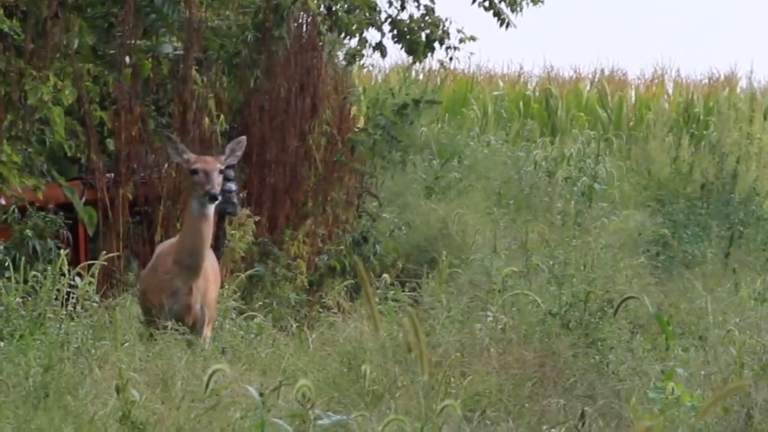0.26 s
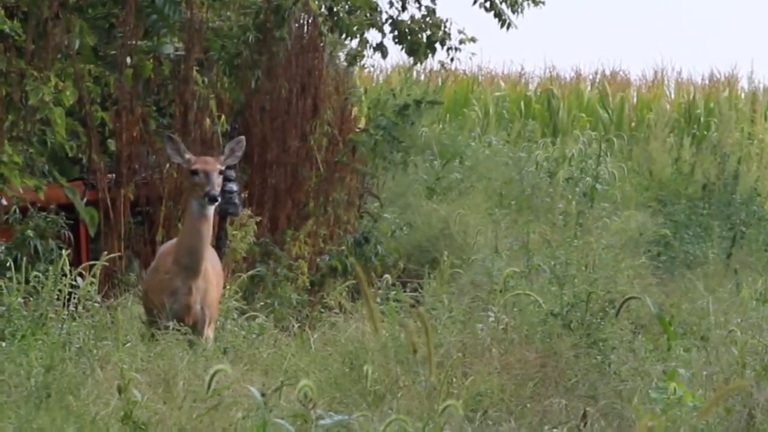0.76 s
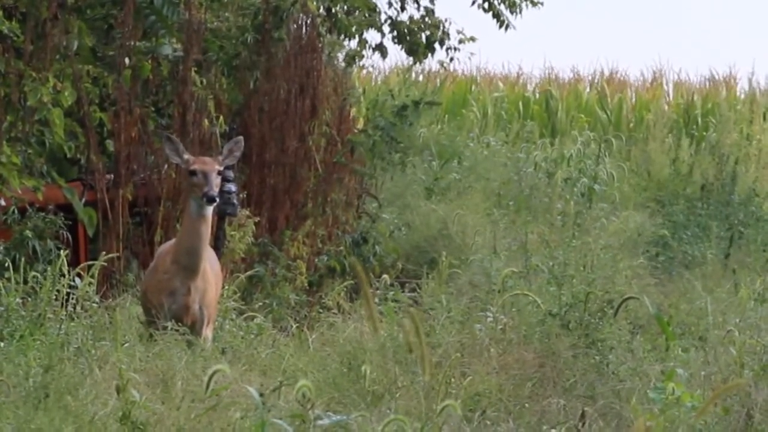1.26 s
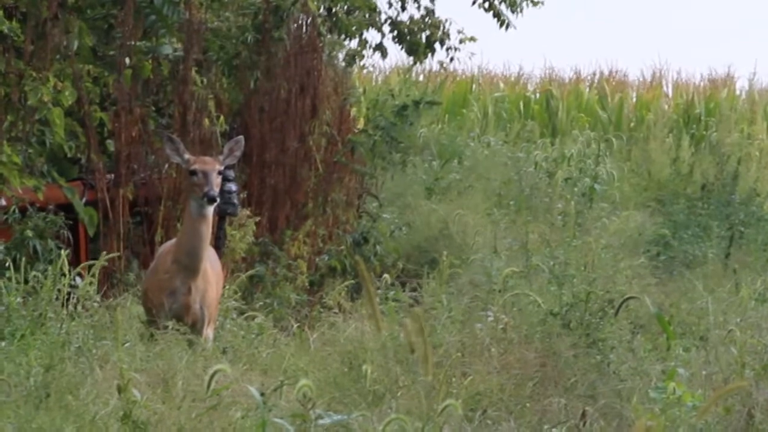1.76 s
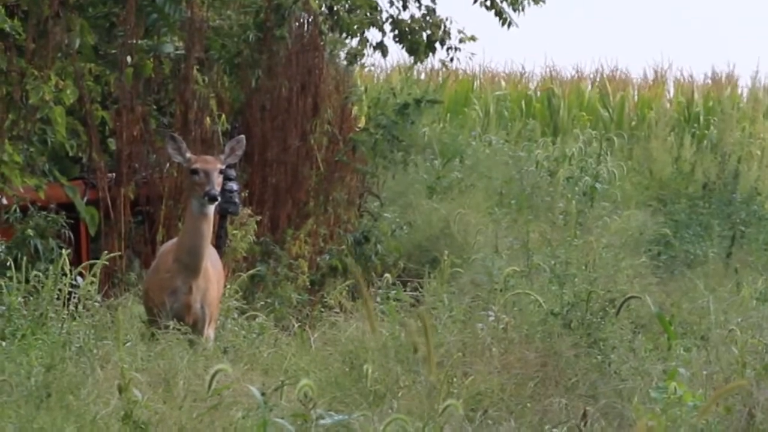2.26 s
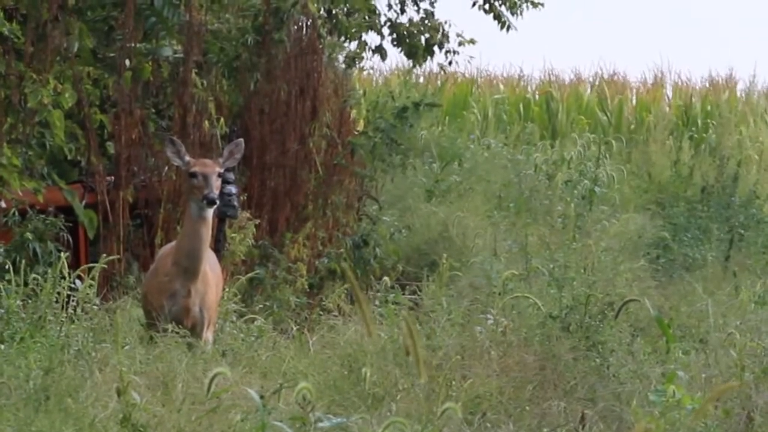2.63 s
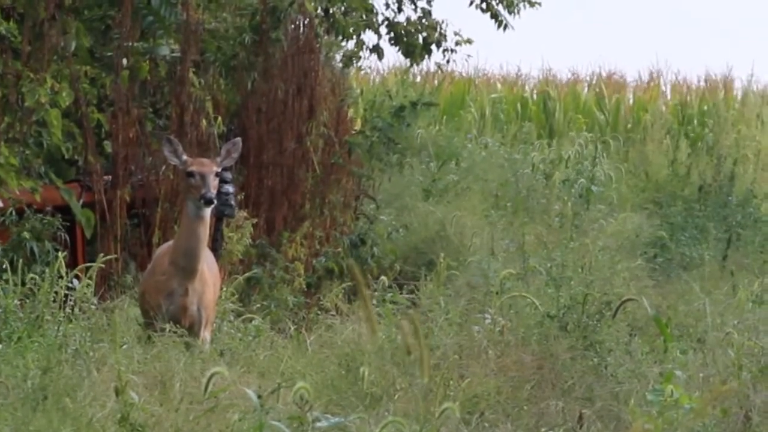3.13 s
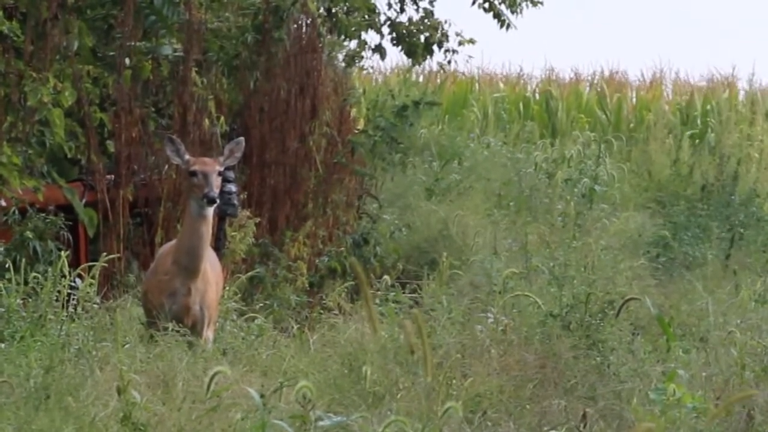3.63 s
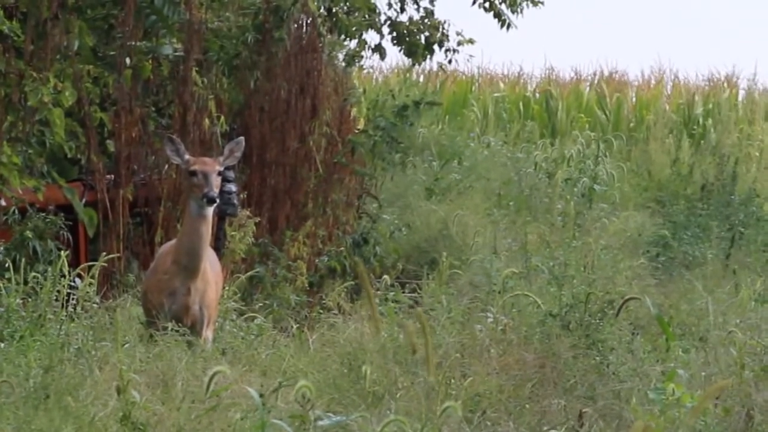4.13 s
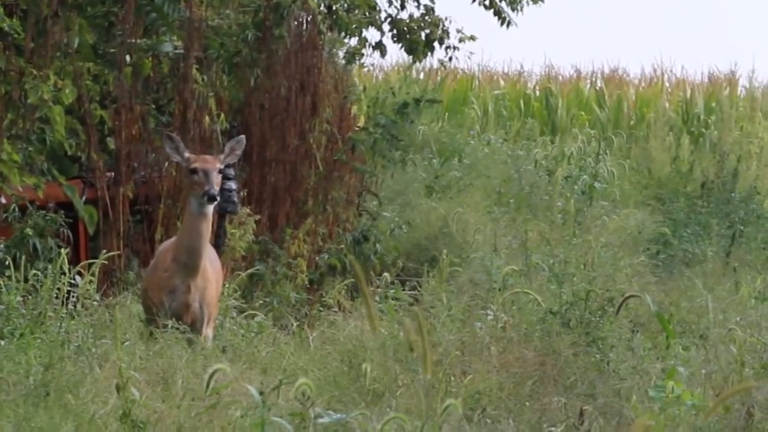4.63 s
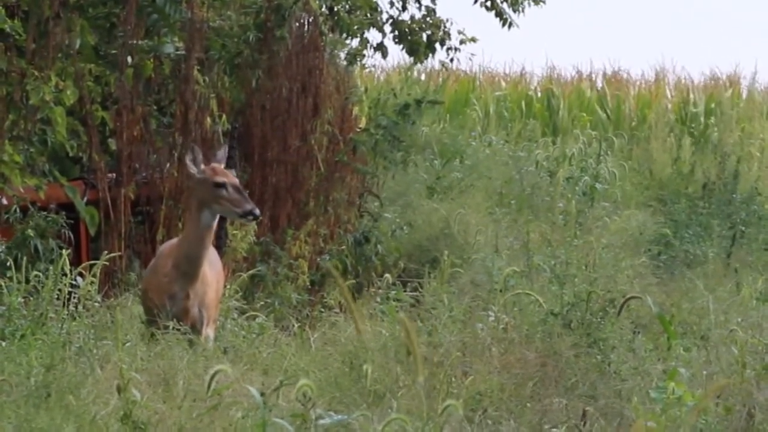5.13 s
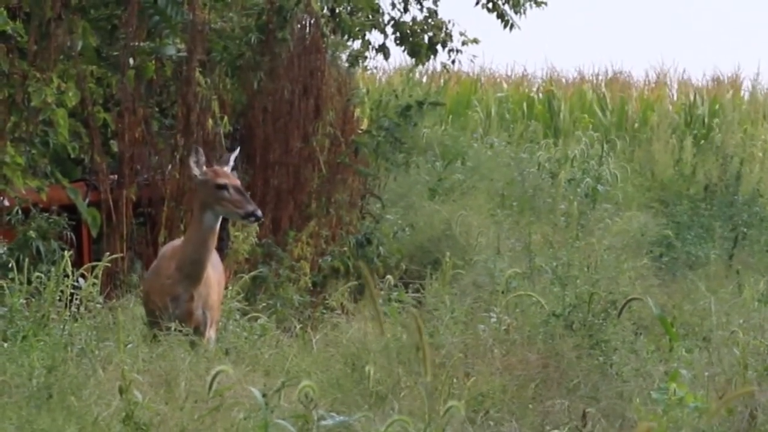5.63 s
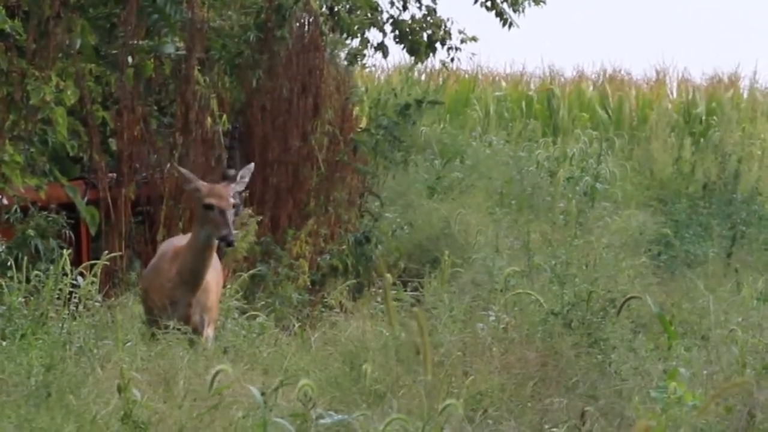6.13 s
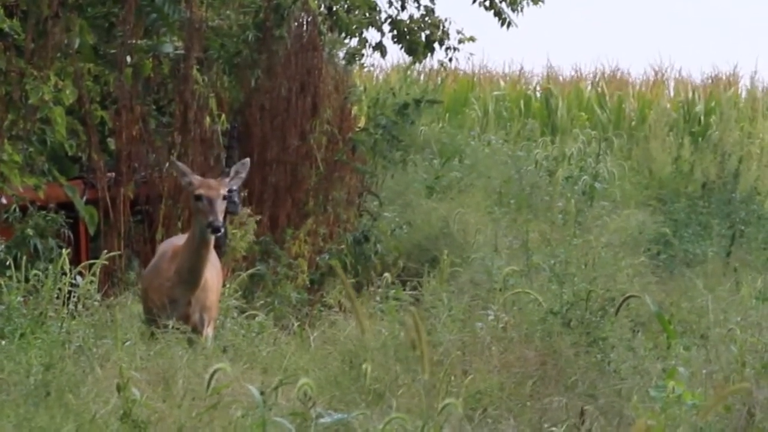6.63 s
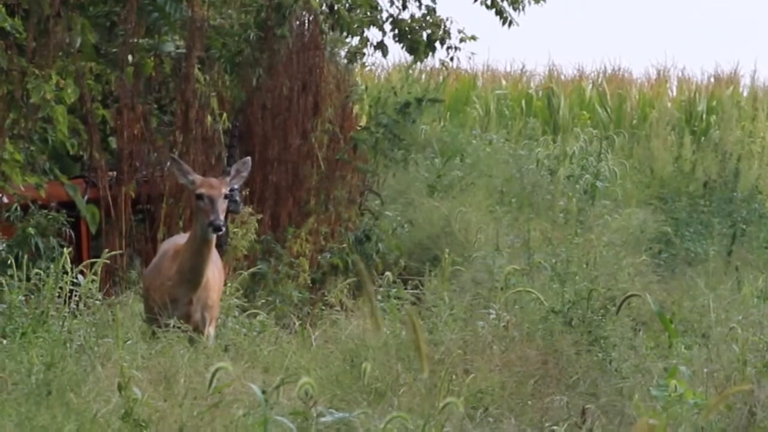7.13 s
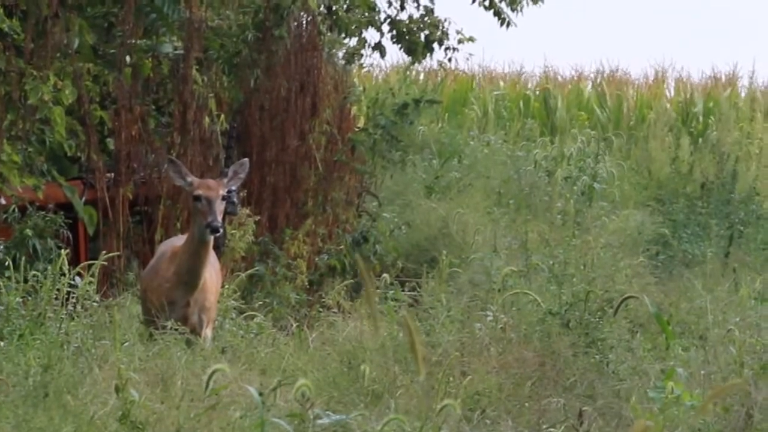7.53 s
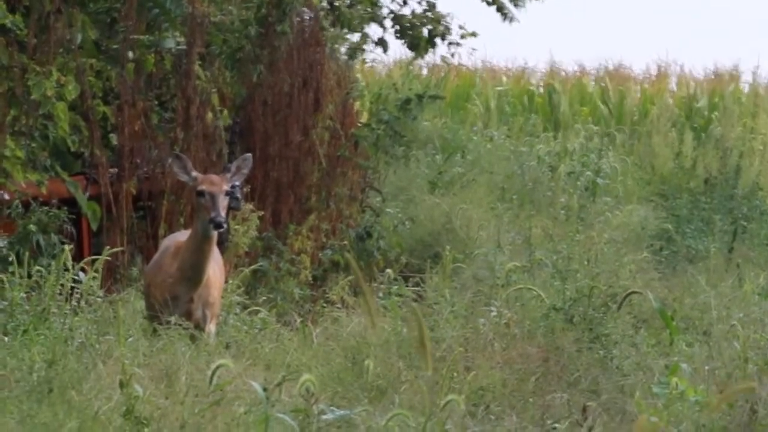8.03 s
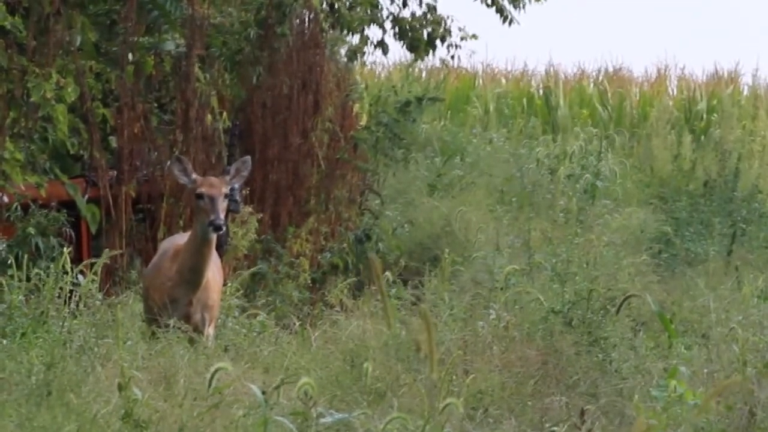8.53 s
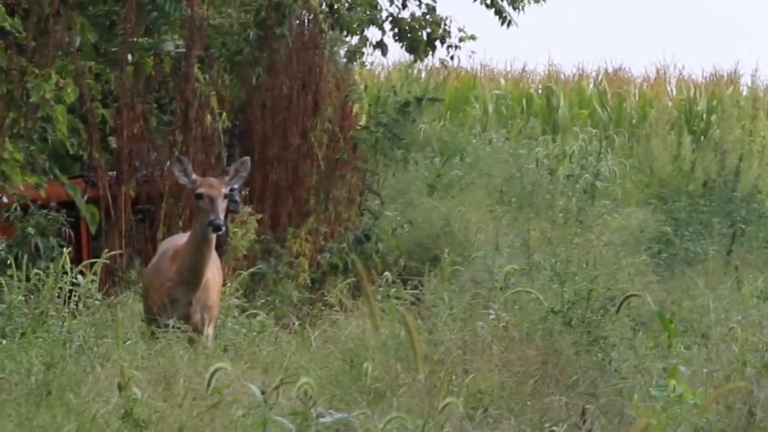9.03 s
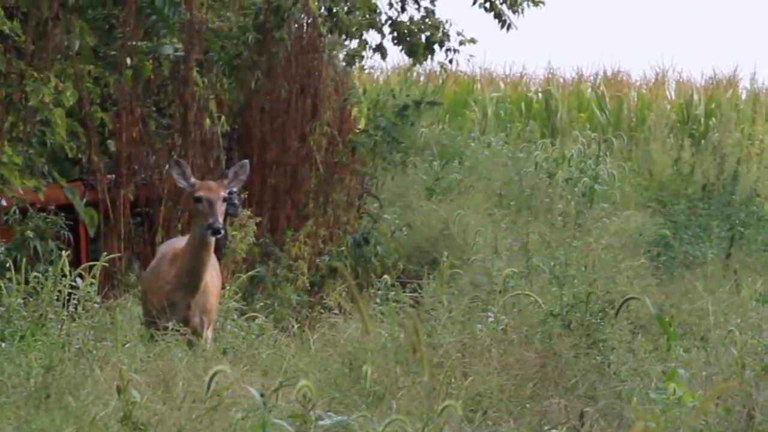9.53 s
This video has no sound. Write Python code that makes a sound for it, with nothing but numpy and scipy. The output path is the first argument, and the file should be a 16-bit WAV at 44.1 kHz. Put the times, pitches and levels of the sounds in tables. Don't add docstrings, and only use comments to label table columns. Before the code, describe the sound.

Outdoor insect chorus with steady fast ticking and three-note chirps over soft wind, while a hand-held camera creaks early and knocks near the end.

```python
import sys
import numpy as np
from scipy import signal
from scipy.fft import rfft, irfft, next_fast_len
from scipy.io import wavfile
from scipy.ndimage import uniform_filter1d

SR = 44100
rng = np.random.default_rng(int(sys.argv[2]) if len(sys.argv) > 2 else 0)


def gain_from_db(level_db):
    decades = np.asarray(level_db, float) / 20
    return 10 ** decades


def to_wav(s):
    ch = np.atleast_2d(s).T
    pcm = np.round(np.clip(ch, -1, 1) * 32767)
    wavfile.write(sys.argv[1], SR, pcm.astype(np.int16))


N = 431298
SECONDS = np.arange(N) / SR


def curve(table, column=1):
    rows = np.array(table, float)
    return np.interp(SECONDS, rows[:, 0], rows[:, column])


def band(x, hz, width_hz):
    return signal.lfilter(*signal.iirpeak(hz, hz / width_hz, SR), x)


def unit(x):
    return x / np.sqrt(np.mean(x ** 2))


def walk(rate):
    hold = int(SR / rate)
    steps = np.repeat(rng.standard_normal(N // hold + 1), hold)
    return unit(uniform_filter1d(uniform_filter1d(steps, hold), hold)[:N])


def wing(ms, start_ms, attack_ms, hold_ms, release_ms, crest_ms, sag, scoop=0, bend=1.504, bow=1, db=0, top=1):
    rise = np.clip((ms - start_ms) / attack_ms, 0, 1)
    fall = np.clip(1 - (ms - start_ms - attack_ms - hold_ms) / release_ms, 0, 1) ** bow
    ratio = top - np.where(ms < crest_ms, scoop, sag) * abs(ms - crest_ms) ** bend
    return ratio, gain_from_db(db) * rise * fall


def strokes(times, db, hz, shape, octave_db=-60, stretch=0.98, scatter_db=-3.5, detune=0.0027, jitter_ms=.4):
    chance = rng.standard_normal((len(times), 4))
    times = times + jitter_ms / 1000 * chance[:, 0]
    length_ms = shape["attack_ms"] + shape["hold_ms"] + shape["release_ms"]
    ms = stretch * shape["start_ms"] + np.arange(0, stretch * length_ms, 1000 / SR)
    ratio, swell = uniform_filter1d(wing(ms / stretch, **shape), size=60)
    own_hz = hz * (1 + detune * chance[:, 1])
    phase = 2 * np.pi * (np.outer(own_hz, np.cumsum(ratio)) / SR + chance[:, 2:3])
    size = np.sqrt(2) * gain_from_db(db + scatter_db * chance[:, 3])
    waves = size[:, None] * swell * (np.sin(phase) + gain_from_db(octave_db) * np.sin(2 * phase))
    where = ((times + ms[0] / 1000) * SR).astype(int)[:, None] + np.arange(len(ms))
    inside = (where >= 0) & (where < N)
    return np.bincount(where[inside], waves[inside], N)


def beat(first_s, rate, lag):
    times = first_s + np.arange(-1, rate * N / SR + 1) / rate
    return times + np.interp(times, *np.transpose(lag)) / 1000


def echoes(x, t60, delay_s=0., sway=1.2):
    t = np.arange(int(t60 * SR)) / SR
    clouds = rng.standard_normal((2, len(t))) * np.exp(-np.log(1000) * t / t60)
    clouds /= np.sqrt(np.sum(clouds ** 2, axis=1, keepdims=True))
    turn = 2 * np.pi * sway * SECONDS + walk(2.5)
    sides = x * np.array([np.cos(turn), np.sin(turn)])
    wet = signal.oaconvolve(sides, clouds, axes=1).sum(axis=0)[:N]
    return np.roll(wet, int(delay_s * SR))


def trillers(hz, rate, db, shape, octave_db, spread, count=2):
    out = 0
    for own_hz, own_rate, start in rng.uniform(-1, 1, (count, 3)):
        gaps = (1 + .04 * own_rate + .05 * rng.standard_normal(int(rate * 12))) / rate
        out = out + strokes(start + np.cumsum(gaps), db, hz * (1 + spread * own_hz), shape,
                            octave_db=octave_db, stretch=min(62 / rate, 1.8), scatter_db=1.5)
    return out


# (pitch [Hz], pace [strokes/s], level [dB])
CHORUS = [(4173, 32, -63), (4330, 34, -60.5), (4486, 43, -61), (4683, 57, -55.5), (4990, 78, -61.5),
          (5060, 60, -56), (5260, 77, -61), (5700, 30, -74), (5960, 34, -61.5), (6050, 48, -56),
          (6364, 45, -52), (6500, 40, -59.5), (7060, 36, -65), (8600, 37, -81)]
# (pitch [Hz], pace [strokes/s], level [dB], octave level [dB])
STEADY_CHORUS = [
    (4673, 63, -65.5, -25),
    (4895, 62.5, -67, -27),
]
# (time [s], level [dB])
CHORUS_SWELL = [
    (0, 3),
    (1.2, -0.7),
    (2.5, -0.4),
    (4, 0.5),
    (5.5, -0.5),
    (7.4, 0),
    (9.78, 0),
]
FALLING_STROKE = dict(start_ms=-4, attack_ms=3.46, hold_ms=6.8, release_ms=2.4, crest_ms=-1.6, sag=0.00457, top=1.01, db=-0.18)
HELD_STROKE = dict(start_ms=-6.5, attack_ms=3.3, hold_ms=6, release_ms=8.4, crest_ms=0.92, sag=0.0021, bow=2.3, db=11)


def far_chorus():
    out = 0
    for hz, rate, db in CHORUS:
        out = out + trillers(hz, rate, db, FALLING_STROKE, octave_db=-40.0, spread=0.0092)
    for hz, rate, db, octave_db in STEADY_CHORUS:
        out = out + trillers(hz, rate, db, HELD_STROKE, octave_db, spread=0.0045)
    swell_db = curve(CHORUS_SWELL)
    out = out * gain_from_db(swell_db - swell_db.mean() + 0.21 * walk(2.76))
    return 0.14 * out + echoes(out, .6)


# (frequency [Hz], level [dB per Hz])
FIELD_TONE = [(25, -9), (45, 1), (110, -2), (300, -5), (600, -9.5), (1100, -10.5), (1600, -14.5),
              (3300, -17), (5000, -18), (7500, -23), (9800, -32.5), (12000, -36), (14000, -41.5),
              (16000, -50)]
# (time [s], level [dB])
GUSTS = [
    (0, -54),
    (.57, -52.5),
    (2.75, -52),
    (3.57, -53.5),
    (6.62, -53),
    (8.33, -50.5),
    (9.78, -51),
]


def wind_in_leaves():
    hz, db = np.transpose(FIELD_TONE)
    size = next_fast_len(N)
    bins = np.fft.rfftfreq(size, 1 / SR) + 1
    noise = rfft(rng.standard_normal(size)) * gain_from_db(np.interp(np.log(bins), np.log(hz), db))
    gust_db = curve(GUSTS)
    out = 0
    for octave in np.arange(4, 16, 2):
        share = np.clip(1 - abs(np.log2(bins) - octave) / 2, 0, 1)
        rustle = np.exp(-((octave - 9.5) / 3.2) ** 2)
        sway_db = rustle * (gust_db - gust_db.mean() + 0.35 * walk(4.6))
        out = out + irfft(noise * share, size)[:N] * gain_from_db(sway_db)
    return unit(out) * gain_from_db(-49.5)


# (time [s], level [dB])
HUM = [
    (0, -55.5),
    (.38, -54.5),
    (1.2, -60),
    (1.74, -55),
    (2.94, -63.5),
    (6.67, -71),
    (7.14, -67.5),
    (9.23, -59),
    (9.78, -60),
]
# (time [s], level [dB])
DRONE = [
    (0.0, -73),
    (0.08, -61),
    (1.17, -63),
    (4.17, -56.5),
    (4.19, -52),
    (6.65, -63),
    (7.27, -50.5),
    (9.12, -68),
    (9.26, -54),
    (9.78, -62),
]


def engines():
    hum_hz = 225 + 0.49 * walk(2.454)
    hum = np.sqrt(2) * np.sin(2 * np.pi * np.cumsum(hum_hz) / SR) * gain_from_db(curve(HUM) - 4.0)
    low = unit(band(rng.standard_normal(N), 87.25, 1.3)) * gain_from_db(curve(DRONE) - 2.5)
    high = unit(band(rng.standard_normal(N), 124.3, 5.8)) * gain_from_db(-72.5 + 5.0 * walk(1.47))
    return hum + low + high


# (time [s], lag behind the beat [ms])
FAST_LAG = [(0, 0), (1.15, 2.5), (2.7, -2.5), (4.2, 1), (4.9, -1), (6.15, -6.5), (7.4, -8), (8.1, -3.5),
            (8.85, -3), (9.1, 0)]
LOW_FAST_LAG = [(.5, 0), (1.03, 12), (1.5, 9), (2, 15), (3.3, 7), (3.55, 10), (3.9, -5), (4.8, 8),
                (6.05, -21), (7.6, -26), (8.3, -26), (9.6, 0)]


def fast_trillers():
    high = strokes(beat(.001, 65.054, FAST_LAG), -49.0, 5250, FALLING_STROKE,
                   octave_db=-44, scatter_db=2.0, jitter_ms=.2)
    low = strokes(beat(.012, 63.486, LOW_FAST_LAG), -50.5, 4880, FALLING_STROKE, octave_db=-24, scatter_db=0.5)
    return high + low


# (time [s], lag behind the beat [ms])
TICKER_LAG = [(0, 2), (1.4, -1.5), (2.6, -.5), (3.27, -6), (4.2, -.5), (4.9, -5), (5.5, -5), (6.3, -1),
              (7, -1.5), (7.6, 1), (8.6, 3.5), (9.8, 1)]
# (time [s], level change [dB])
TICKER_STUMBLES = [
    (4.035, -6),
    (4.136, -9),
    (7.612, -9),
]
ARCHED_STROKE = dict(start_ms=-13.5, attack_ms=5.8, hold_ms=13.3, release_ms=5.1, crest_ms=-3.5, scoop=0.00199, sag=0.00207, db=-1.03)


def ticking_cricket():
    ticks = beat(.0086, 19.584, TICKER_LAG)
    tick_db = -42 + sum(db * (abs(ticks - s) < 1 / 50) for s, db in TICKER_STUMBLES)
    return strokes(ticks, tick_db, 6600, ARCHED_STROKE, scatter_db=0.6)


# (middle stroke [s], rms level [dB], pitch [Hz], opener's lead [ms])
CHIRPER_NEAR = [(.073, -43.5, 4280, 50), (.739, -45, 4360, 99), (1.991, -43, 4190, 79),
                (3.683, -40, 4270, 48), (4.262, -34, 4290, 62), (5.006, -42, 4200, 74),
                (5.604, -40.5, 4270, 72), (6.171, -36, 4265, 61), (6.779, -35.5, 4280, 54),
                (7.418, -36, 4310, 55), (8.08, -36.5, 4260, 60), (8.775, -36.5, 4270, 62),
                (9.392, -34, 4270, 67)]
# (middle stroke [s], rms level [dB])
CHIRPER_FAR = [(.265, -40), (.927, -42), (1.545, -42), (2.155, -41), (2.772, -37), (3.465, -41),
               (4.074, -39.5), (4.655, -39), (5.301, -43.5), (5.922, -41), (6.538, -39.5), (7.146, -39),
               (7.832, -38), (8.478, -39.5), (9.131, -40), (9.79, -44)]
OPENER_STROKE = dict(start_ms=-5, attack_ms=2.2, hold_ms=2, release_ms=20, crest_ms=-3, sag=.0016, bow=1.8, db=-2.5, top=1.008)
CHIRP_STROKE = dict(start_ms=-8.5, attack_ms=4, hold_ms=9.5, release_ms=7, crest_ms=-4, sag=.00000017, bend=5, bow=1.5, db=-2.7, top=1.0)
BLUNT_STROKE = dict(start_ms=-16, attack_ms=13, hold_ms=4, release_ms=18, crest_ms=0.91, sag=0.0013, db=-4.5)
OVERTONE_STROKE = dict(start_ms=-24.5, attack_ms=6, hold_ms=13, release_ms=12, crest_ms=-11, scoop=.0002, sag=.0013, bow=1.2)


def field_crickets():
    closer_db, closer_ratio = .3, 1.004

    s, db, hz, lead_ms = np.transpose(CHIRPER_NEAR)
    out = strokes(s - lead_ms / 1000, db - 1.7, hz * .992, OPENER_STROKE,
                  octave_db=-23.5, scatter_db=1.5, detune=.002)
    out += strokes(np.r_[s, s + .071], np.r_[db, db + closer_db], np.r_[hz, hz * closer_ratio], CHIRP_STROKE,
                   octave_db=-26.5, scatter_db=1.7, detune=0.0016)

    far_hz = 4178
    s, db = np.transpose(CHIRPER_FAR)
    s = np.r_[s - .055, s, s + .063]
    db = np.r_[db - 4.5, db, db + closer_db]
    hz = far_hz * np.repeat([.99, 1, closer_ratio], len(CHIRPER_FAR))
    out += strokes(s, db, hz, BLUNT_STROKE, scatter_db=1.8, detune=0.003)
    octave = strokes(s, -63.5, 2 * hz, OVERTONE_STROKE, scatter_db=1, jitter_ms=1.3)

    hedge = gain_from_db(-12.0) * np.roll(out, int(0.02 * SR))
    octave_hedge = gain_from_db(-6) * np.roll(octave, int(0.017 * SR))
    return out + hedge + octave + octave_hedge


# (start [s], count [strokes], effort at the start [0-1], effort gained [per stroke])
SLOW_BOUTS = [
    (.079, 13, 1, 0),
    (7.636, 26, 0, .03),
]
SAGGING_STROKE = dict(start_ms=-16.5, attack_ms=11, hold_ms=7.2, release_ms=12.5, crest_ms=-3.5, sag=.001)


def slow_cricket():
    out = 0
    for start, count, effort, gain in SLOW_BOUTS:
        effort = effort + gain * np.arange(count)
        gaps = np.interp(effort, [0, 1], (82.07, 89.35)) / 1000
        idle_to_full = [0, .62]
        db = np.interp(effort, idle_to_full, (-49, -39.5))
        hz = np.interp(effort, idle_to_full, (5650, 5775))
        out = out + strokes(start + np.cumsum(gaps) - gaps, db, hz, SAGGING_STROKE, scatter_db=1.6)
    return out


# (time [s], peak level [dB])
CRACKLES = [(.4875, -33.5), (.5122, -23), (.5148, -34), (.5215, -30), (0.527, -21.5), (.5298, -22.5),
            (0.5317, -34), (0.544, -30.5), (0.5601, -29), (0.579, -34.5), (0.6243, -30.5), (0.6653, -34),
            (0.6713, -33), (0.676, -35)]
# (time [s], peak level [dB])
TICKS = [(0.7196, -34), (.9399, -36), (1.8633, -36), (3.1735, -40), (4.169, -42), (4.627, -38),
         (6.1764, -40), (8.417, -39), (9.252, -38), (9.5683, -46), (9.7234, -38)]
# (time [s], peak level [dB], ring t60 [ms], brightness [Hz])
KNOCKS = [
    (.5165, -31, 90, 7000),
    (.5285, -26, 50, 1400),
    (3.6722, -41, 29, 8000),
    (9.6351, -14, 18, 3400),
    (9.6354, -25, 90, 400),
    (9.637, -18, 16, 6000),
    (9.639, -27, 95, 3500),
    (9.6455, -33, 70, 7000),
]


def touches(count=9):
    crackles = [row + (24, 4500) for row in CRACKLES]
    ticks = [row + (15, 3500) for row in TICKS]
    slide = np.linspace(0, 1, count) + rng.uniform(-0.0377, 0.0387, count)
    rub = [(np.interp(k, [0, 1], (2.449, 2.535)), -37.5, 70, 2820 * (700 / 2820) ** k) for k in slide]
    return crackles + ticks + KNOCKS + rub


# (centre [Hz], width [Hz], level [dB])
SHELL = [
    (207, 130, -2),
    (460, 400, 2),
    (710, 104, 2),
    (1080, 450, 4.5),
    (1950, 950, -2),
    (3230, 1500, -11.5),
    (5700, 2200, 3),
    (8300, 9000, -36),
]


def camera_clicks():
    push = np.zeros(N + SR)
    t = np.arange(SR // 8) / SR
    for s, db, t60_ms, bright_hz in touches():
        rattle = 0.26 * rng.standard_normal(len(t)) * np.exp(-np.log(1000) * t * 1000 / t60_ms)
        rattle[0] = 1.8
        soft = signal.butter(2, bright_hz, fs=SR)
        first = int(s * SR)
        push[first:first + len(t)] += gain_from_db(db) * signal.lfilter(*soft, rattle)
    shell = 2.81 * sum(gain_from_db(db) * band(push[:N], hz, width) for hz, width, db in SHELL)
    return signal.lfilter(*signal.butter(2, 10500, fs=SR), shell)


# (time [s], rms level [dB], pitch [Hz])
SQUEAKS = [(4.055, -52, 6800), (7.612, -53, 6750), (7.632, -47, 6840), (2.705, -41, 4260),
           (2.788, -45, 4100), (2.86, -40, 4320), (3.15, -44, 4260), (6.375, -43, 4740), (1.424, -44, 4340),
           (2.328, -42, 4350), (3.238, -46, 4330), (3.301, -46, 4060)]


def stray_notes():
    return strokes(*np.transpose(SQUEAKS), BLUNT_STROKE, stretch=1.0)


def scene():
    background = far_chorus() + wind_in_leaves() + engines()
    near = fast_trillers() + ticking_cricket() + field_crickets() + slow_cricket() + stray_notes()
    maize = gain_from_db(-10.0) * echoes(near, .25, delay_s=.006)
    mono = background + near + maize + camera_clicks()
    return np.array([mono, mono])


def top_cut(x):
    return signal.sosfilt(signal.butter(12, 15710, fs=SR, output="sos"), x)


def record(dry):
    return top_cut(dry)


dry = scene()
out = record(dry)
to_wav(out)
```